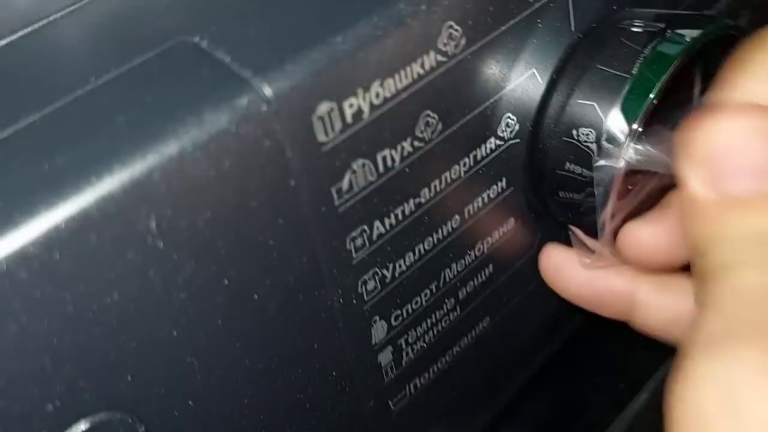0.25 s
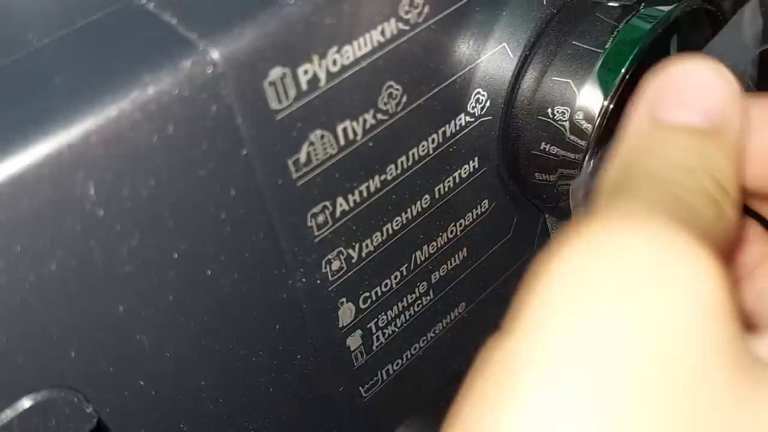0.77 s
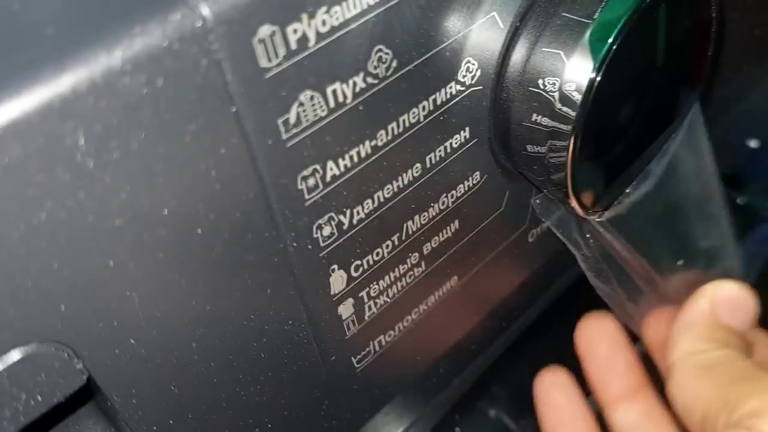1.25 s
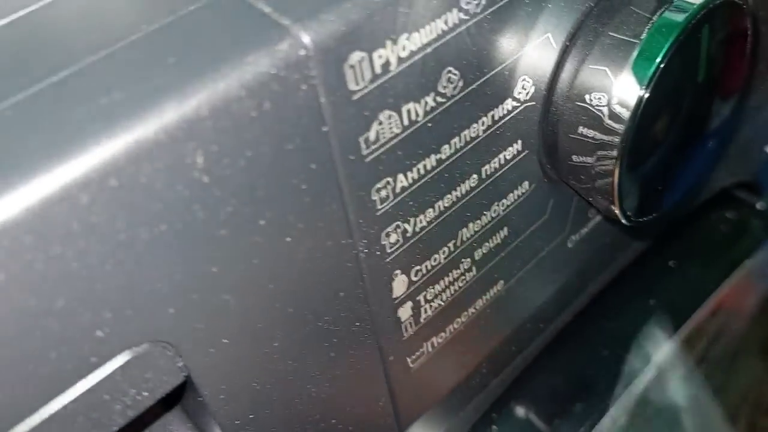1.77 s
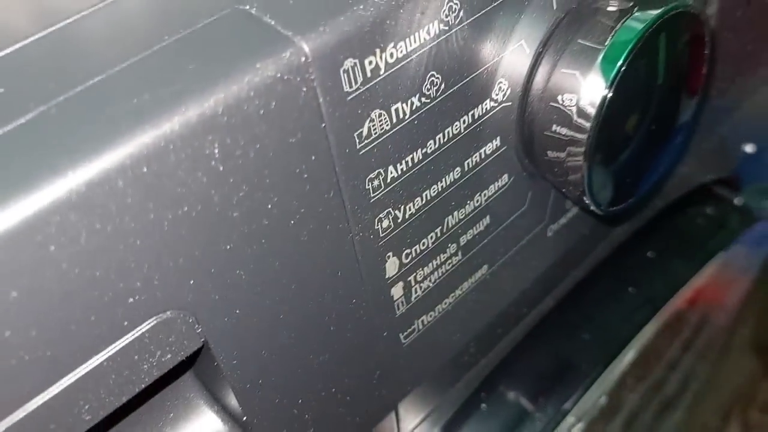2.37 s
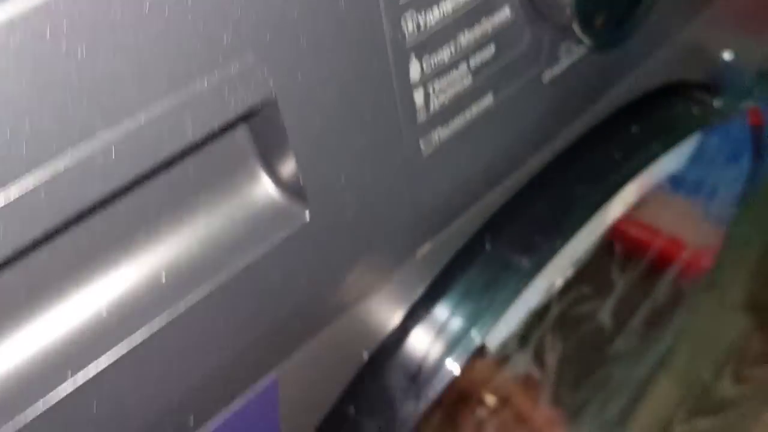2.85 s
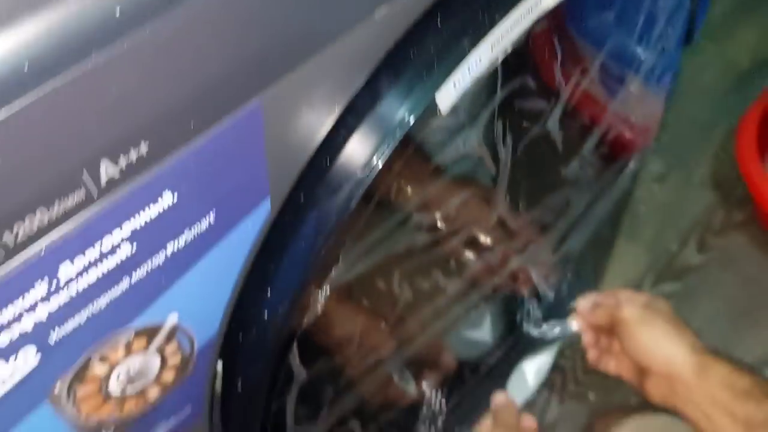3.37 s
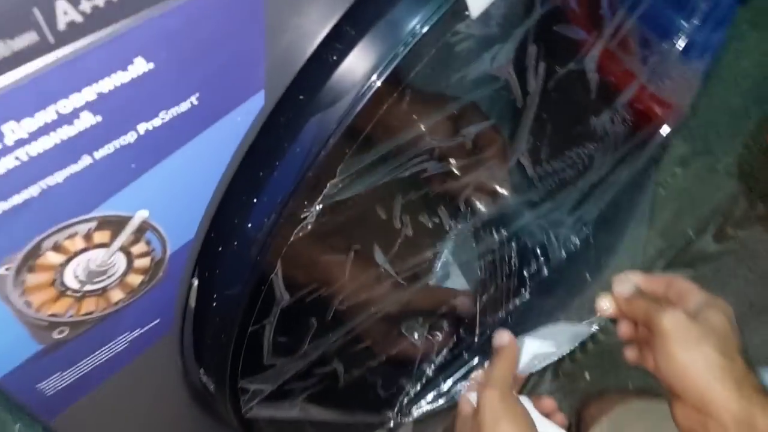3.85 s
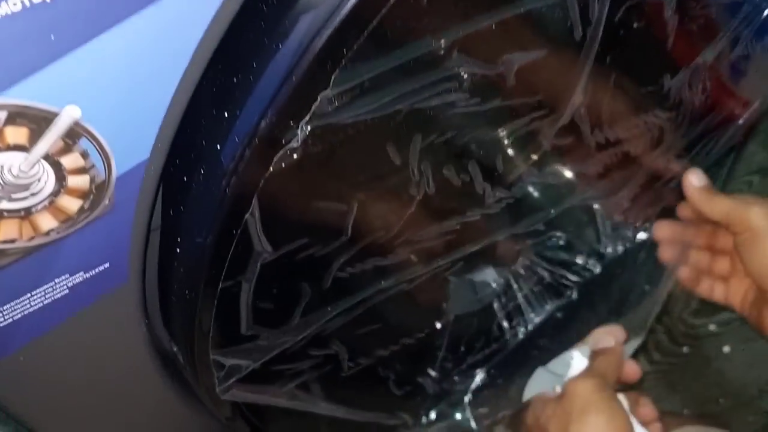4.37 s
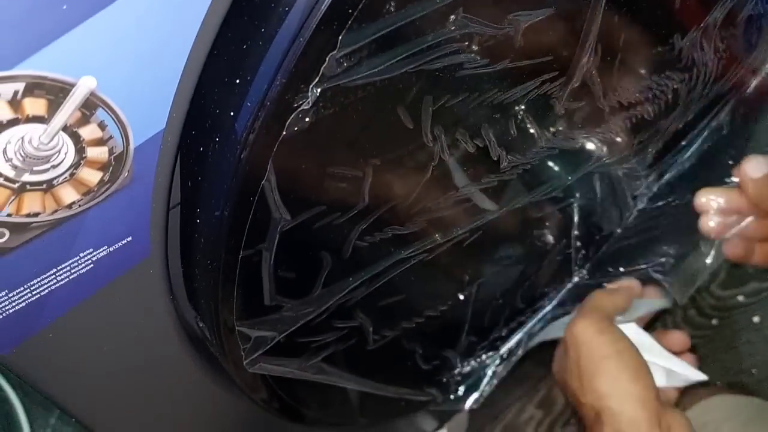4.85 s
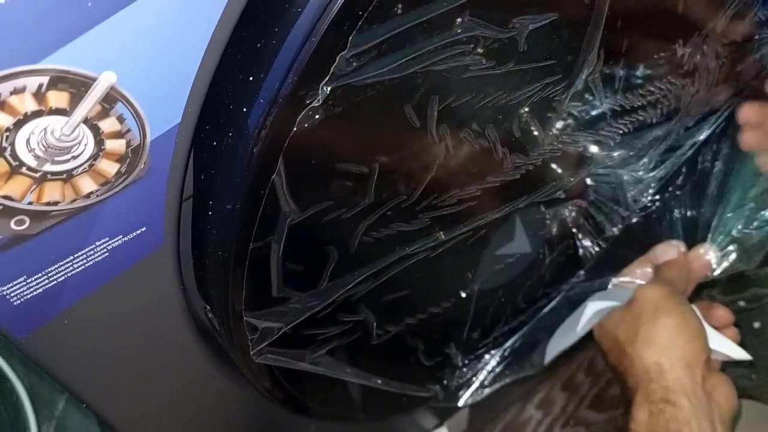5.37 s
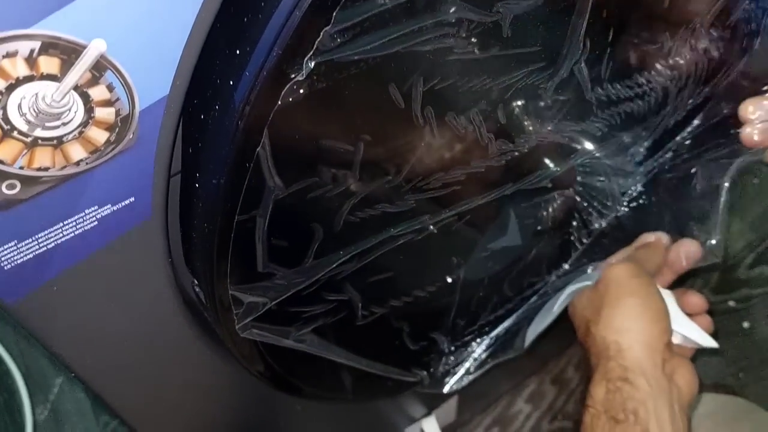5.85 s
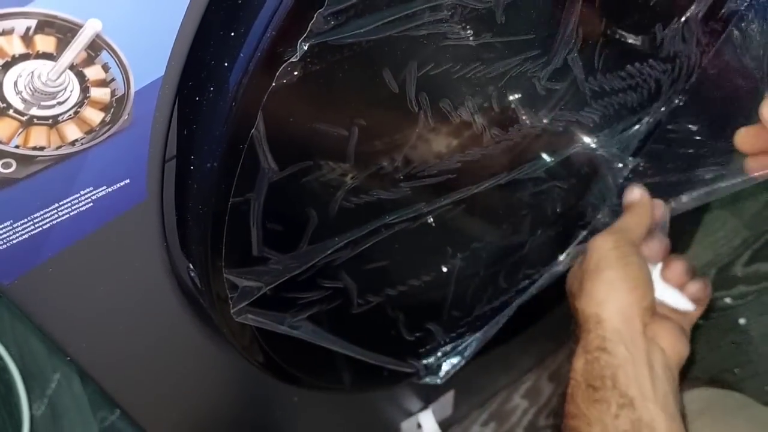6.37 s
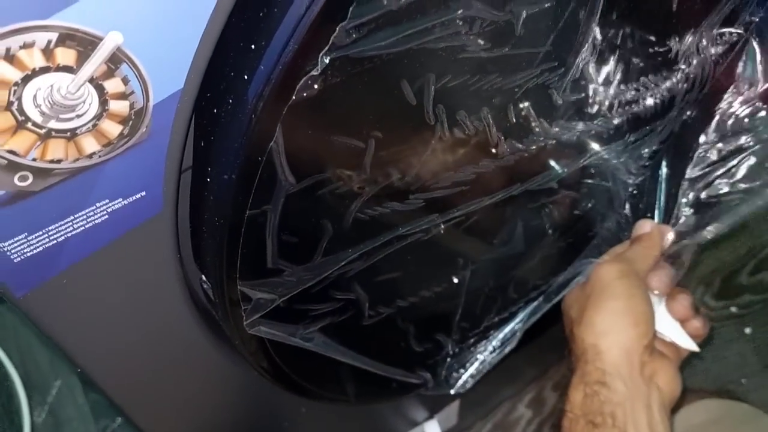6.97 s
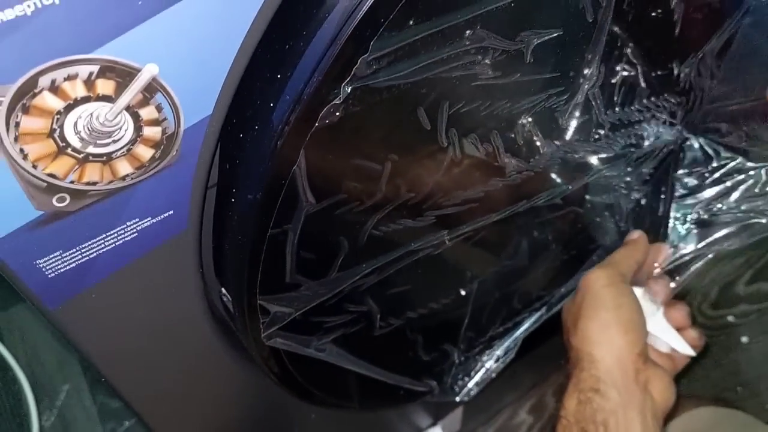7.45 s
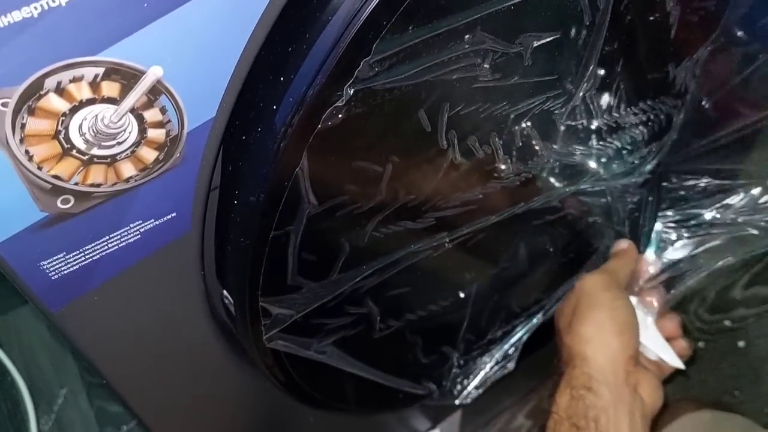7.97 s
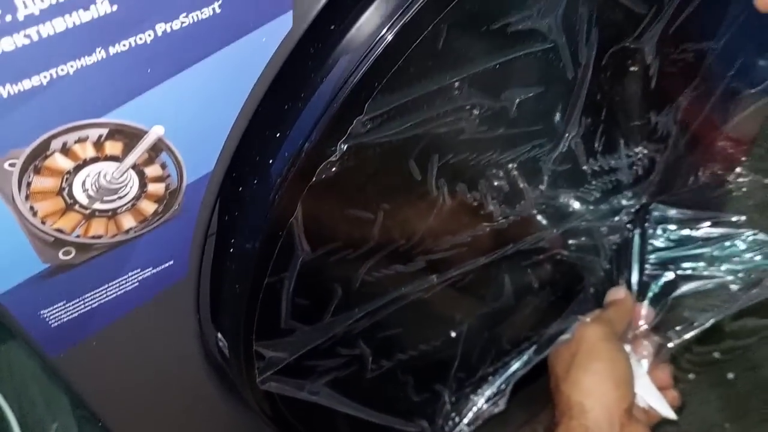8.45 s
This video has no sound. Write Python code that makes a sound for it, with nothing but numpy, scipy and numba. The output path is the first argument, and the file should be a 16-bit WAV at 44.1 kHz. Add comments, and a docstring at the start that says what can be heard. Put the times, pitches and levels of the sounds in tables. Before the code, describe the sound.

Close stereo pickup in a small quiet room. A small piece of plastic film peels off a dial, slightly right, in dry, bright ticking pulls with short gaps. Then a large sheet comes off the door, louder and fuller: snaps, rattling crinkles and a hollow drumming whose pitch drops as film comes free. Dull hand rubs and soft low thuds on the casing fall among the pulls.

```python
"""Peeling film off a washing machine

Two microphones in a small room: protective film comes off the near dial, then off the door, in separate pulls.
Each pull breaks loose with a snap, swells or eases, and dies away; tiny glue slips, made as noise bursts,
crackle, rattle the sheet and drum on the air pocket under it, a resonance whose note falls as film comes free.
Creases flip as sharp bursts, the hand rubs on the casing as dull noise, and thuds ring single low modes."""
import sys
import numpy as np
from scipy import signal
from scipy.fft import rfft, irfft, next_fast_len
from scipy.io import wavfile
from scipy.ndimage import uniform_filter1d, map_coordinates
from numba import njit

SR = 44100
rng = np.random.default_rng(int(sys.argv[2]) if len(sys.argv) > 2 else 0)


def dump_mix(stems):
    """Bounce the given channels to the path in sys.argv[1] as a 16-bit WAV at rate SR."""
    frames = np.atleast_2d(stems).T  # one column per channel
    limited = np.clip(frames, -1, 1)  # hard clip at full scale
    pcm = np.round(limited * 32767).astype(np.int16)
    wavfile.write(sys.argv[1], SR, pcm)


N = 384111
TIME = np.arange(N) / SR  # s

# pulls on the film, relative levels at mid-pull: (start [s], length [s], swell over the pull [dB],
# opening snap against the pull's start [dB], crackle [dB], sheet [dB], pocket [dB])
PULLS = [(0, 0.038, -4, 1.5, -56, -48, -44), (0.088, 0.21, 10, 0, -38, -37, -48),
         (0.3298, 0.037, 0, 1.5, -28, -30, -44), (0.569, 0.024, -2, -22, -65.5, -65, -46),
         (0.784, .05, 2, 4.5, -43, -42.5, -57), (0.888, 0.086, 14, 5.5, -27, -32, -46),
         (1.016, .11, 0, 1, -25, -31, -42.5), (1.223, 0.073, -2, -12, -24, -31.5, -44),
         (1.485, 0.029, 3, -56, -31, -32, -46), (1.63, 0.11, -2, 5, -39, -40, -45),
         (1.973, 0.19, 13, 6.5, -35, -33, -36), (2.4078, 0.076, -4, 2, -38, -36, -37),
         (2.516, 0.053, 6, 1.5, -27, -23, -24), (2.673, .14, 4, 3, -33, -31, -31),
         (2.868, .11, 1.5, 5, -36, -32.5, -28), (2.988, .03, 0, 2, -33, -24.5, -16),
         (3.169, 0.087, 5, 13.5, -66, -53, -39.5), (3.254, 0.058, 5, 2.5, -46, -44, -48),
         (3.319, 0.038, -2.5, 4, -37, -36, -44), (3.407, .07, 2, 1, -38, -35, -32),
         (3.482, 0.039, 0, 4, -34, -28, -25), (3.533, .155, -1, 0, -32, -23, -19),
         (3.795, 0.087, -2, 15.5, -44, -33, -24), (3.985, 0.041, 6, -6, -46, -50.5, -50),
         (4.031, 0.18, -6, 7.5, -45, -42, -37), (4.273, 0.052, -1, -2, -39, -39, -40),
         (4.497, 0.053, 4, 7, -52, -47.5, -51), (4.655, 0.18, 15, 8.5, -36, -33, -32),
         (4.806, .15, 2, -14, -25, -23, -24), (5.029, .035, -2.5, -4.5, -48.5, -44.5, -30),
         (5.179, 0.041, -2.5, 1, -42.5, -38, -36), (5.288, 0.053, -3.5, 7.5, -53, -49.5, -46),
         (5.525, .05, 0, 5, -58, -54, -60), (5.611, 0.025, -2.5, 0, -40, -41, -43),
         (5.7586, 0.09, 2.5, 5, -33, -31, -33), (5.855, 0.2, -6.5, 0, -27, -25, -25),
         (6.057, 0.064, 2, -3, -25, -24, -24), (6.154, .105, -1, -8, -28, -27, -23),
         (6.312, .045, -3, 11, -44, -43, -42), (6.421, 0.11, -2, -2, -44, -42, -41),
         (6.835, 0.022, 0, -2.5, -29.5, -43.5, -43), (6.871, 0.088, -0.5, -11, -58, -52, -42),
         (6.967, .12, 8, 8, -37, -35, -34), (7.09, .16, 5, -9, -28, -27, -29),
         (7.539, .045, 0.5, 6, -27, -25.5, -26.5), (7.591, 0.057, -1, -5.5, -22, -21, -19.5),
         (7.837, 0.031, -3, 3, -49.5, -47, -46.5), (7.967, 0.13, 6.5, -10, -46, -46.5, -46.5),
         (8.089, 0.05, -6.5, 9, -53.5, -48.5, -39.5), (8.396, 0.14, 4, 1.5, -49, -49.5, -49),
         (8.6068, .11, 1, 8.5, -28, -29, -34.5)]
# spectrum of the slack film: (frequency [Hz], relative level [dB])
SLACK_SHEET = [(500, -11.5), (1050, -8), (1550, 3), (2400, 1.5), (3200, -2), (4500, 1.5), (5500, -4),
               (8000, -36)]
# spectrum of the front panel: (frequency [Hz], relative level [dB])
FRONT_PANEL = [(25, -26.5), (65, -12), (150, -3.5), (300, -3.5), (800, -1), (1200, -5.5), (2500, -61)]


def amp(db):
    """Decibels to gain."""
    return 10 ** (np.asarray(db) / 20)


def along(points, hz):
    """(Hz, value) points read on a log frequency axis."""
    f, v = np.transpose(points)
    return np.interp(np.log(hz + 1), np.log(f), v)


def filtered(x, response):
    """x times a complex response of frequency."""
    m = next_fast_len(N + SR // 2)
    return irfft(rfft(x, m) * response(np.fft.rfftfreq(m, 1 / SR)), m)[..., :N]


def colour(x, points, size=4096):
    """A causal filter of unit energy with the given spectrum."""
    # folding the cepstrum onto positive times makes the filter minimum phase
    cepstrum = irfft(np.log(amp(along(points, np.fft.rfftfreq(size, 1 / SR)))))
    cepstrum[1:size // 2] *= 2
    cepstrum[size // 2 + 1:] = 0
    kick = irfft(np.exp(rfft(cepstrum)))
    return filtered(x, lambda hz: rfft(kick, next_fast_len(N + SR // 2))) / np.linalg.norm(kick)


def steady(x, size=1000):
    """x held near rms 1 over a few hundredths of a second; very faint stretches stay lower."""
    power = np.abs(uniform_filter1d(uniform_filter1d(x * x, size), size))
    return x / np.sqrt(power + np.mean(power) / 200)


@njit
def resonate(x, step, damping):
    """A resonance whose frequency (radians a sample) moves."""
    out, place, speed = np.zeros(len(x)), 0., 0.
    for i in range(len(x)):
        speed += step[i] * (damping * (x[i] - speed) - place)
        place += step[i] * speed
        out[i] = speed
    return out


def direct(x, lag_ms):
    """The film is off to the right, so the left microphone hears it later, by a lag that wanders."""
    wander_ms, wanders_per_s = 0.07, 14  # the sounding spot jumps about on the film
    x = np.ravel(x)
    knots = rng.standard_normal(400)
    lag = lag_ms + wander_ms * np.interp(TIME * wanders_per_s, np.arange(len(knots)), knots)
    left = map_coordinates(x, [np.arange(N) - lag * SR / 1000], order=3)
    return np.array([left, x])


def at_dial():
    """1 while the small, near film on the dial is pulled, 0 for the big one on the door."""
    return np.interp(TIME, [1.7, 1.95], [1, 0])


def pulls():
    """Crackle, sheet and pocket level in dB: each pull tightens, breaks loose, swells evenly, lets go and settles."""
    lead_db, lead_db_per_s = -12, 400  # the film creaks briefly as it tightens before a pull
    release_db_per_s = 330  # a pull dies this fast once the hand stops
    settle_db, settle_db_per_s = -19, 95  # the freed film rustles on, fainter and for longer
    t = TIME[::32]  # a coarse grid is enough for levels
    power = np.full((3, len(t)), amp(-85) ** 2)
    for start, length, swell_db, _, *levels in PULLS:
        before = np.maximum(start - t, 0)
        after = np.maximum(t - start - length, 0)
        lead = np.where(t < start, amp(lead_db - lead_db_per_s * before), 1)
        held = amp(swell_db * (np.clip((t - start) / length, 0, 1) - .5))
        release = np.maximum(amp(-release_db_per_s * after), amp(settle_db - settle_db_per_s * after))
        power += np.outer(amp(levels), lead * held * release) ** 2
    return [np.interp(TIME, t, 10 * np.log10(p)) for p in power]


def pocket_note():
    """The note of the newest air pocket in Hz, falling evenly in pitch."""
    # a new pocket opens under the lifted film: (time [s], first note [Hz], fall [octaves/s])
    openings = [(2.05, 920, 3.08), (2.499, 618, 3), (2.775, 900, 1.9), (2.939, 740.4, 6.5),
                (3.17, 638, 1.91), (3.404, 945.5, 1.95), (3.5, 619.2, 5.06), (4.679, 1049, 7.5),
                (5.85, 772, 6), (6.99, 654, 2.4), (7.2, 400, 10), (7.595, 643.5, 17.5),
                (8.608, 799.5, 4.34)]
    lowest_hz = 228  # the pocket grows until its note has sunk to that of the door
    hz = np.full(N, float(lowest_hz))
    for s, first_hz, fall in openings:
        at = int(s * SR)
        hz[at:] = first_hz * 2 ** (-fall * TIME[:N - at])
    return uniform_filter1d(np.maximum(hz, lowest_hz), size=800)


def snap_list(edge_db):
    """Rows (s, crackle dB, sheet dB, pocket dB): the snap that opens each pull, and the creases."""
    # creases that flip on their own: (time [s], relative level [dB], brightness [dB])
    crease_flips = [(0.0996, -40.5, 5), (.1665, -29, 4), (0.18, -32.5, 10.5), (0.2506, -32.5, 8),
                    (0.2948, -40.5, 11.5), (.303, -37.5, 12.5), (0.8342, -31.5, 9), (1.177, -40.5, 13.5),
                    (1.194, -40, 11.5), (1.4737, -50, 11.5), (2.056, -24, -3.5), (2.1184, -23.5, -2),
                    (2.1389, -24, -6), (2.4655, -28.5, -3.5), (2.7778, -17, -7.5), (2.942, -24.5, -6.5),
                    (3.009, -19.5, -2), (3.5052, -20, -6.5), (3.636, -16, -6), (3.684, -18.5, -7.5),
                    (3.8574, -16.5, -6), (4.063, -24.5, -5), (4.395, -42.5, -4.5), (4.429, -43, -3),
                    (4.6283, -58, 21), (4.6893, -28, 0), (4.7227, -21, -5.5), (4.752, -19, -6),
                    (4.787, -19, -11), (5.45, -47.5, -0.5), (5.7393, -36, -1), (6.096, -20.5, -2),
                    (6.769, -52.5, 2), (6.796, -44, 8), (7.404, -36.5, 4), (7.461, -38, 6.5),
                    (7.5162, -38.5, 7), (7.924, -41.5, -2.5), (8.18, -56, 13.5), (8.459, -34.5, 2)]
    rows = []
    for s, _, swell_db, snap_db, *levels in PULLS:
        rows.append((s, *(np.array(levels) - swell_db / 2 + snap_db)))
    for s, db, bright_db in crease_flips:
        rows.append((s, db + edge_db + bright_db, db, db + edge_db - bright_db))
    return np.array(rows)


def snaps(rows):
    """A snap is one sharp push: spikes of energy for crackle, sheet and pocket."""
    s, *levels = np.transpose(rows)
    at = (s * SR).astype(int)
    return np.array([np.bincount(at, amp(db) ** 2, N) for db in levels])


def crinkles(pull_db, rate, follow, scatter_db, levels_db):
    """Small creases flip at random, louder when the film is pulled harder: spikes of energy like the snaps."""
    draws = rng.random((900, 2))
    at = (np.cumsum(-np.log(draws[:, 0])) / rate * SR).astype(int)  # rate in flips per s
    at, size = at[at < N], draws[at < N, 1]
    db = follow * (uniform_filter1d(pull_db, size=4000)[at] + 33) + scatter_db * (2 * size - 1)
    return np.outer(amp(levels_db) ** 2, np.bincount(at, amp(db) ** 2, N))


def stall(times, hold, hold_db):
    """The peel line sticks, for about hold seconds, while strain builds up for a snap."""
    dip = np.zeros(N)
    for s in times:
        near = slice(max(int((s - 5 * hold) * SR), 0), int((s + 5 * hold) * SR))
        dip[near] = np.maximum(dip[near], np.exp(-((TIME[near] - s + hold / 2) / hold) ** 2))
    return amp(hold_db * dip)


def slips(pull_db, rate, growth, scatter, size_db, rub):
    """The glue sticks and slips, more often when pulled harder: a spike of energy a slip, over a faint even rub."""
    turns = np.cumsum(rate * amp(growth * (pull_db + 35))) / SR  # rate in turns per s at -35 dB
    draws = rng.standard_normal((20000, 2))
    at = np.searchsorted(turns, np.cumsum(np.exp(scatter * draws[:, 0])))
    sizes = amp(size_db * np.clip(draws[:, 1], -2, 1))
    inside = at < N
    return np.bincount(at[inside], sizes[inside] ** 2, N) + rub / SR


def flutter(energy, crack_t60, ring_t60, ring):
    """Every spike is a fresh burst: a crack, then the shiver of the film, which differs at each microphone."""
    def burst(t60, channels):
        keep = amp(-120 / (t60 * SR))  # energy kept per sample, falling 60 dB in t60 seconds
        level = np.sqrt(np.abs(signal.lfilter([1 - keep], [1, -keep], energy)))
        return level * rng.choice([-1, 1], (channels, N))
    crack = direct(burst(crack_t60, channels=1), lag_ms=0.348)
    shiver = burst(ring_t60, channels=2)
    return (crack + ring * shiver) / np.hypot(1, ring)


def taut(drive, excess_db, turn_db, width_db):
    """Slack film drums and rattles low; stretched film crackles more than it drums, and rattles high."""
    # spectrum of the stretched film: (frequency [Hz], relative level [dB])
    stretched_sheet = [(700, -33.5), (1200, -4), (1800, 4), (2800, 4), (3700, 7), (4700, 6.5), (5700, 0),
                       (8000, -11)]
    tension = .5 + .5 * np.tanh((excess_db - turn_db) / width_db)
    return steady(tension * colour(drive, stretched_sheet) + (1 - tension) * colour(drive, SLACK_SHEET))


def crumple(x, patchy_db):
    """As the film changes shape its facets favour ever different frequencies."""
    z = signal.stft(x, nperseg=256)[2]
    field = rng.standard_normal(z.shape[1:])
    field = uniform_filter1d(uniform_filter1d(field, size=5, axis=0), size=9, axis=1)
    gain = amp(patchy_db * field / field.std())
    return signal.istft(z * gain / np.sqrt(np.mean(gain ** 2)), nperseg=256)[1][:, :N]


def pocket(drive, note_hz, damping, note_db, door_db):
    """The panel thrums; on the door the pocket adds its falling note, and a large pocket moves the door's own modes."""
    # modes of the door: (frequency [Hz], width [Hz], relative level [dB])
    door_modes = [(153.4, 20, 4), (229.9, 2.8, 11), (347.6, 38, -2), (433, 20, -8), (465, 13, -8),
                  (710, 4.3, -3)]

    def door(f):
        return sum(amp(db) * 1j * f * w / (c * c - f * f + 1j * f * w) for c, w, db in door_modes)
    thrum = colour(drive, FRONT_PANEL)
    note = (1 - at_dial()) * resonate(thrum, 2 * np.pi * note_hz / SR, damping)
    area = (300 / note_hz) ** 0.33  # a lower note means a larger pocket
    return steady(amp(note_db) * note + area * (thrum + amp(door_db) * filtered(thrum, door)))


def film():
    """Slips and snaps sound through the peel line, the loose sheet and the pocket: (bright part, low part)."""
    # spectrum of the peel line: (frequency [Hz], relative level [dB])
    peel_line = [(2500, -46), (5000, -12), (6500, 4.5), (10300, 1.5), (11800, 4.5), (14500, 5.5),
                 (16000, -5.5)]
    crackle_db, sheet_db, pocket_db = pulls()
    pull_db = np.maximum(crackle_db, sheet_db)
    stretch_db = crackle_db - pocket_db  # a stretched film tears finer than a slack one
    note_hz, dial = pocket_note(), at_dial()
    snapping = snap_list(edge_db=-2)
    going = stall(snapping[:, 0], hold=0.013, hold_db=-3.5)

    # the small film lets go in a dry, nearly even ticking; the big one tears unevenly and shivers
    ticks = slips(pull_db, rate=170, growth=.9, scatter=.3, size_db=3, rub=15)
    tears = slips(pull_db + .9 * stretch_db, rate=210, growth=.6, scatter=.6, size_db=4.5, rub=14)
    peel = dial * steady(flutter(ticks, crack_t60=.003, ring_t60=.025, ring=.55))
    peel += (1 - dial) * steady(flutter(tears, crack_t60=0.0041, ring_t60=0.079, ring=1.0))

    small_creases = crinkles(pull_db, rate=32, follow=0.74, scatter_db=5.5, levels_db=[-41, -40, -42])
    crack, flap, knock = snaps(snapping) + small_creases

    crackle = peel * going * amp(crackle_db)
    crackle += amp(25) * flutter(crack, crack_t60=0.0022, ring_t60=0.059, ring=0.82)
    sheet = taut(peel, stretch_db, turn_db=1, width_db=7.5) * going * amp(sheet_db)
    flaps = flutter(flap, crack_t60=0.01, ring_t60=0.055, ring=0.87)
    sheet += amp(23.5) * colour(flaps, SLACK_SHEET)
    low = going * amp(pocket_db) * pocket(peel[1], note_hz, damping=0.2, note_db=12, door_db=9)
    knocks = flutter(knock, crack_t60=0.0036, ring_t60=0.096, ring=1.0)[1]
    low += amp(18.5) * colour(knocks, FRONT_PANEL)
    return colour(crackle, peel_line) + crumple(sheet, patchy_db=3.0), low


def thuds():
    """The hand and the released film thud on the machine: soft blows, each ringing one low mode."""
    # (time [s], frequency [Hz], level before rise and decay [dB], rise [s], t60 [s])
    blows = [(0, 68, -30, 0.0044, 0.23), (0, 155, -23.5, 0.0021, 0.11), (.565, 211, -38.5, 0.019, 0.33),
             (3.796, 230.2, -11, 0.0018, 0.23), (3.858, 224.7, -7, 0.0031, 0.22),
             (4.063, 148.8, -18.5, 0.0046, 0.14), (5.19, 225.6, -31, 0.0066, 0.44),
             (5.347, 467, -24, 0.00055, 0.032), (6.089, 173, -2.5, 0.024, 0.09),
             (8.045, 97.2, -14, 0.025, 0.27), (8.503, 101, -19, 0.013, 0.47)]
    out, t = np.zeros(N + SR), np.arange(SR // 2) / SR
    for s, hz, db, rise, t60 in blows:
        envelope = amp(db - 60 * t / t60) * (1 - np.exp(-t / rise))
        out[int(s * SR):][:len(t)] += envelope * np.sin(2 * np.pi * hz * t)
    return out[:N]


def hand():
    """The hand rubs and leans on the machine: dull, uneven rumble of skin on the casing."""
    # how strongly the hand rubs: (time [s], level [dB])
    rubbing = [(0, -49), (.42, -42.5), (.65, -85), (1, -48.5), (1.6, -55.5), (1.9, -62), (3.3, -52),
               (4.15, -36), (4.5, -62), (5.05, -40), (5.55, -63), (6.2, -36.5), (6.7, -70), (7.25, -33.5),
               (7.95, -60), (8.35, -63), (8.7, -36)]
    # spectrum of the rubbing: (frequency [Hz], relative level [dB])
    rumble = [(25, -30.5), (70, 5.5), (140, 3.5), (240, -5.5), (600, -22), (2500, -32)]
    s, db = np.transpose(rubbing)
    return amp(np.interp(TIME, s, db)) * colour(rng.standard_normal(N), rumble)


def hush():
    """The faint even noise of the room."""
    # spectrum of the still room: (frequency [Hz], relative level [dB])
    still_room = [(25, -12.5), (120, -6.5), (400, -22), (1200, -39.5), (3200, -68), (4700, -13),
                  (6500, -29.5), (16000, -38.5)]
    return colour(rng.standard_normal((2, N)), still_room)


def echoes(x, decay, delay, size=8192):
    """Diffuse reflections at two microphones; their pattern is redrawn block by block, as the hands move."""
    out = np.zeros((2, N + 2 * SR))
    for start in range(0, N, size):
        hz, t, z = signal.stft(rng.standard_normal((2, SR // 3)), SR, nperseg=256)
        fading = amp(-60 * t / along(decay, hz)[:, None])
        tail = signal.istft(z * fading, SR, nperseg=256)[1]
        tail /= np.linalg.norm(tail, axis=1, keepdims=True)
        wet = signal.fftconvolve(x[None, start:start + size], tail, axes=1)
        out[:, start + int(delay * SR):][:, :wet.shape[1]] += wet
    return out[:, :N]


def scene():
    """Film, thuds and hand heard directly, film and thuds also through the room, over the hush."""
    # decay of the small room: (frequency [Hz], t60 [s])
    room_decay = [(150, 0.38), (400, 0.48), (1000, 0.32), (3000, 0.36), (8000, 0.27), (16000, 0.17)]
    bright, low = film()
    low = low + thuds()
    dial = at_dial()  # the dial is nearer than the door, and further right
    to_room = amp(-2 * dial) * (amp(-6.0) * bright[1] + amp(-10.0) * low)
    room = echoes(to_room, room_decay, delay=.006)
    sides = amp(np.outer([-4.5, 2.5], dial))  # left and right gain
    near = bright * sides + direct(low + hand(), lag_ms=0.26)
    return near + room + amp(-67.5) * hush()


def record(dry):
    """The sharpest peaks are rounded off, and nothing is kept above the band limit."""
    ceiling, top_hz = .9, 16100
    rounded = ceiling * dry / (ceiling ** 4 + dry ** 4) ** .25
    return filtered(rounded, lambda hz: hz < top_hz)


dry = scene()
out = record(dry)
dump_mix(out)
```